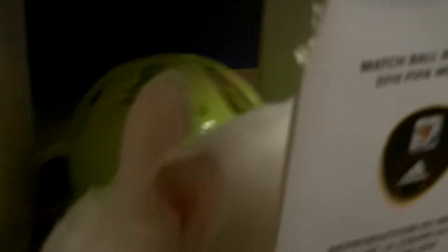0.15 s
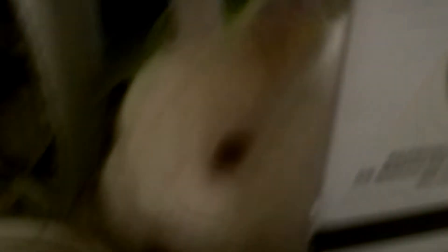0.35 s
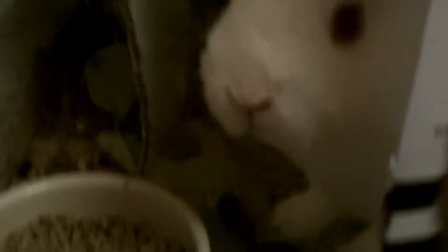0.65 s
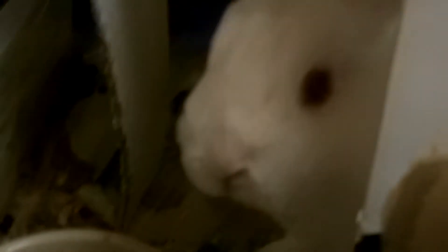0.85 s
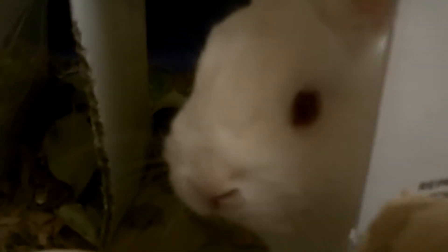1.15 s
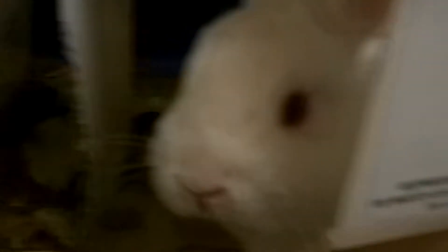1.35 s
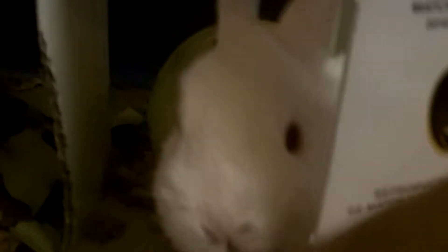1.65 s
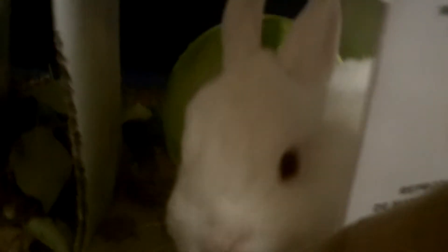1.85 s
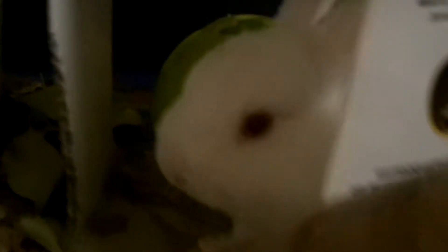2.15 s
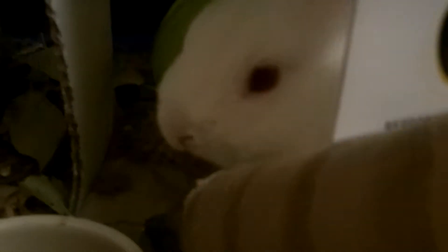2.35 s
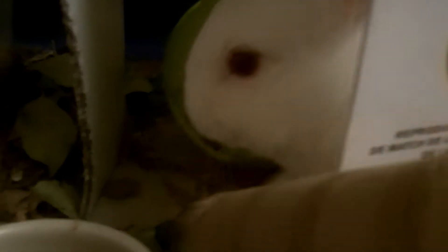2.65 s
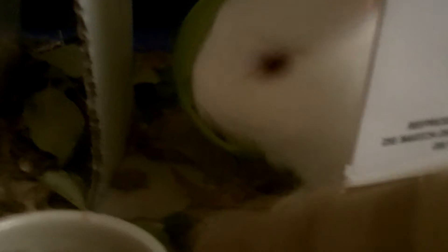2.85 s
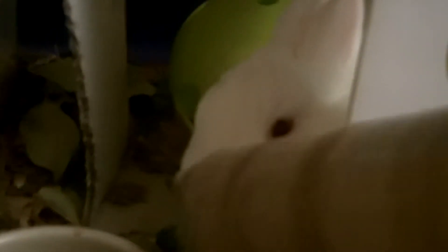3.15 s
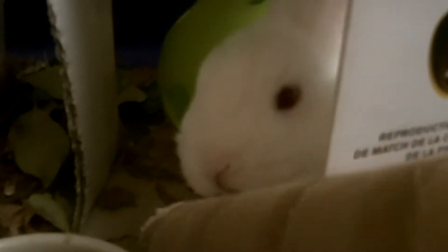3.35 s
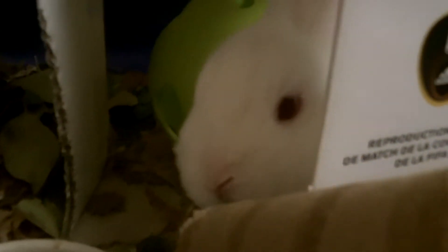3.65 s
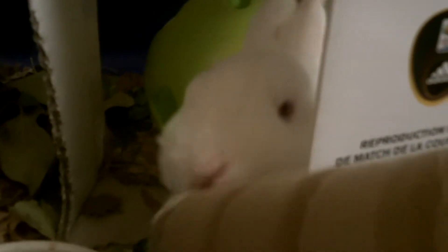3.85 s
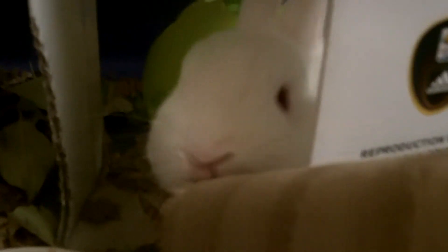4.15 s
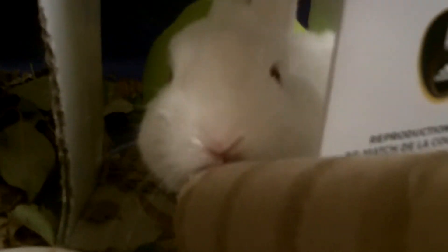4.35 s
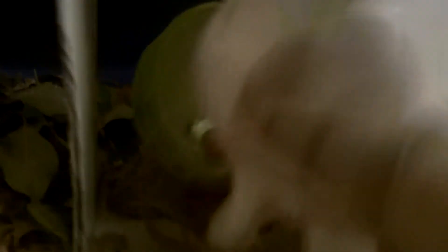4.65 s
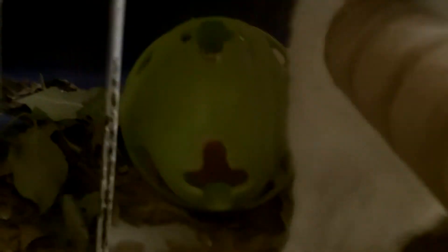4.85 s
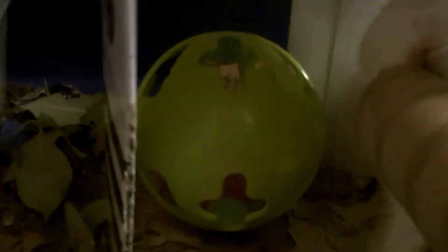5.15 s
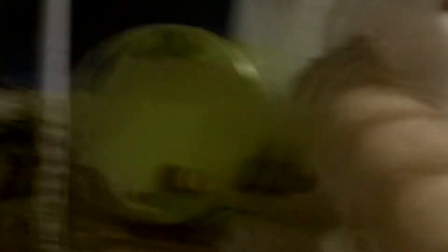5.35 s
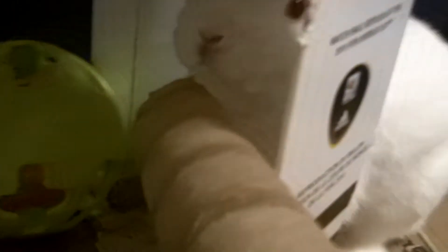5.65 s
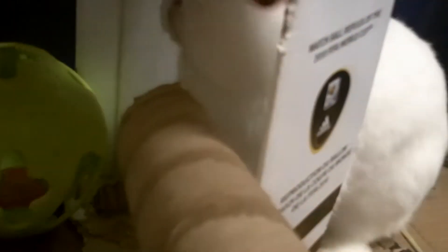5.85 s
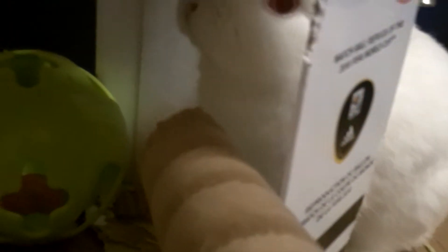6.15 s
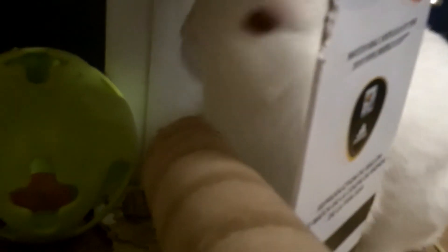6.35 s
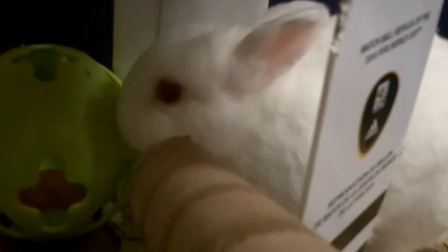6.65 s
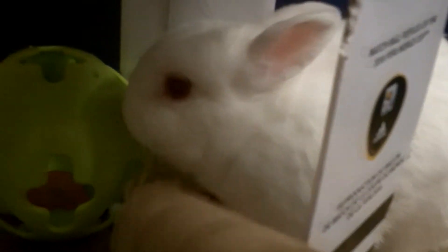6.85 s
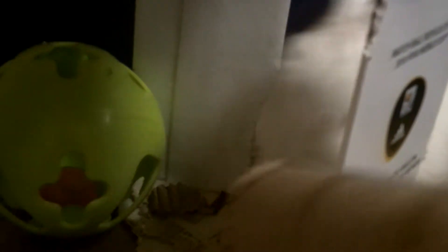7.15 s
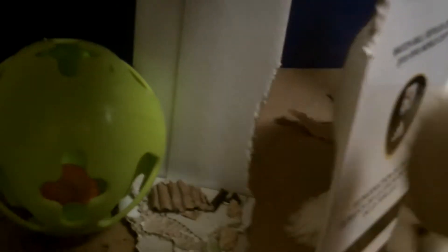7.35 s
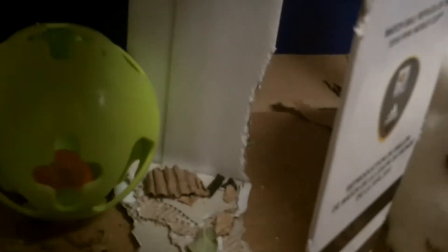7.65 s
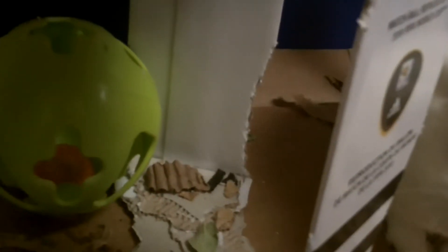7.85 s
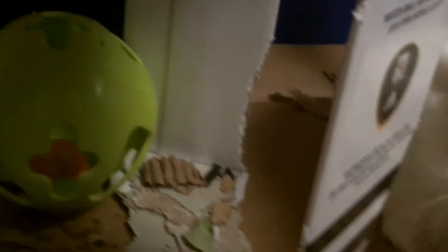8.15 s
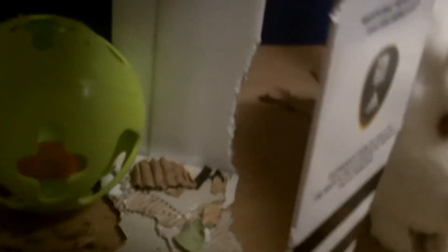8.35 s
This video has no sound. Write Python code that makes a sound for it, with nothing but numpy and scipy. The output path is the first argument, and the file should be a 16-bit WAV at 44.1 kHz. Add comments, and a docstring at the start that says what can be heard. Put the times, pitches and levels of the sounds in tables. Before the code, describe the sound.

Close to a cage in a quiet room, a rabbit scrapes cardboard. A scrape, a hollow plastic knock and tiny high squeaks open; a loud cluster of snaps and a boxy thump follow at one and a half seconds. Smaller rasps and ticks lead to another busy burst near five seconds, then sparse muffled rustles and a few late clicks.

```python
"""A quiet room, close to a cage: a small rabbit tugs and shoves at a cardboard box.
Card scrapes (dense fibre clicks), snaps (millisecond noise avalanches) and booms (resonant box).
Paws and a cardboard tube thump on the floor (damped partials); a hollow plastic ball is knocked
and brushed (ringing modes). Something smooth slips in thin, stuttering squeaks (runs of rasps).
A room tail and a faint hush lie behind."""
import sys
import numpy as np
from scipy import signal
from scipy.fft import rfft, irfft
from scipy.io import wavfile
from scipy.ndimage import uniform_filter1d, map_coordinates

SR = 44100
rng = np.random.default_rng(int(sys.argv[2]) if len(sys.argv) > 2 else 0)


def dump_mix(stems):
    """Bounce the given channels to the path in sys.argv[1] as a 16-bit WAV at rate SR."""
    frames = np.atleast_2d(stems).T  # one column per channel
    limited = np.clip(frames, -1, 1)  # hard clip at full scale
    pcm = np.round(limited * 32767).astype(np.int16)
    wavfile.write(sys.argv[1], SR, pcm)


N = 375732
TIME_S = np.arange(N) / SR
CUTOFF_HZ = 15500

# Event levels are relative: each source adds its own gain.
# tugs and shoves, card on card: peak t/s, level/dB, rise/s, fall/s, body re level/dB, edge re level/dB
STROKES = [(0, -38, .02, .14, -9, -3), (0.258, -50, 0.17, 0.44, -3, 2.5), (.58, -61, 0.19, 0.22, -5, 0.5),
           (1.47, -40.5, 0.023, 0.19, 7, -12), (1.58, -29.5, 0.087, 0.16, -2, -1),
           (1.745, -42, 0.058, .25, -3, -0.5), (1.87, -44, 0.016, 0.12, -1, 2.5),
           (1.99, -43.5, 0.022, 0.13, -5, 0.5), (2.08, -37.5, 0.065, .05, -6, 1.5),
           (2.18, -50.5, 0.19, 0.096, -1.5, 5), (2.28, -51.5, 0.11, 0.063, -4.5, 3),
           (2.37, -54.5, 0.075, 0.053, 0, 0.5), (2.435, -56, 0.02, 0.077, 1, 5),
           (2.67, -53, 0.3, 0.22, -1.5, -0.5), (2.85, -40, 0.022, 0.11, 2, -6),
           (2.995, -47.5, 0.058, 0.08, 5.5, -18), (3.08, -47, 0.1, 0.086, 0.5, -1.5),
           (3.17, -60.5, .08, 0.44, 4, -0.5), (3.5, -58.5, .04, 0.46, 13, -14),
           (3.92, -57, 0.25, 0.39, -8, 4.5), (4.048, -44.5, 0.063, 0.044, 5, 6),
           (4.33, -57, 0.32, 0.25, -14, 1.5), (4.385, -52, 0.092, 0.11, 7.5, -1),
           (4.521, -46, 0.085, 0.053, -1, -5.5), (4.565, -48.5, 0.065, 0.04, 1, 7),
           (4.758, -33, 0.11, 0.34, -8, 2.5), (4.89, -37, 0.24, 0.21, -6, -8.5),
           (5.128, -35.5, 0.032, .025, -8, 3.5), (5.16, -41, 0.24, 0.18, 2, 3),
           (5.23, -41.5, 0.12, 0.057, -17, -4), (5.42, -59.5, .04, 0.7, -3.5, -3),
           (5.729, -58, 0.18, 0.056, -2.5, 4), (5.81, -58, 0.044, 0.53, 1, 1.5),
           (6.12, -64.5, 0.077, 0.16, 8.5, -16), (6.419, -55.5, 0.089, 0.08, 6.5, -5.5),
           (6.71, -57, 0.14, .26, 3.5, -4), (6.87, -54, 0.095, .4, 0.5, -8),
           (7.0, -50.5, 0.16, 0.07, -6, -6), (7.242, -43.5, 0.045, 0.065, 4.5, -2.5),
           (7.29, -54, 0.044, 0.1, -9, 7), (7.429, -45, 0.083, 0.057, -11.5, 5.5),
           (7.58, -53, 0.24, 0.13, -7, 5), (7.83, -55, .04, 0.28, 4, -4), (8.28, -38, 0.079, 0.15, -14, -5),
           (8.41, -44.5, 0.22, 0.096, 4, -3), (8.484, -43.5, 0.019, .4, -1.5, 3)]
# resonances of the card and the hollows between them: f/Hz, width/Hz, lift/dB
CARD_MODES = [(300, 45, 4), (402, 19, 6.5), (535, 28, -2), (629, 39, 6.5), (906, 320, 4.5), (1194, 110, -3),
              (1377, 130, 3), (1760, 210, 2.5), (2070, 98, 3.5), (2610, 410, 2), (3430, 200, 2.5),
              (4787, 237, 6), (5750, 250, 2)]
# scrape spectrum: f/Hz, density/dB per Hz
SCRAPE_COLOUR = [(200, 8), (330, 6), (600, 1), (1000, -0.5), (2000, -0.5), (3500, 2), (5500, 0.5),
                 (7000, -9.5), (9500, -18), (11500, -6), (15000, -34)]
# bites, claws, creases giving way:
# t/s, level/dB, body re level/dB, edge re level/dB, length below 6 kHz/s, ring f/Hz
SNAPS = [(0.002, -25.5, -4, -5.5, 0.003, 4800), (0.106, -38, -35, 4.5, 0.0025, 3080),
         (0.723, -56.5, 5.5, -2.5, 0.0042, 4960), (1.453, -32, 3.5, -1, 0.0076, 5760),
         (1.469, -23, -10, -5.5, 0.0052, 5240), (1.482, -22, -11, -4, 0.0054, 3530),
         (1.494, -21, -27, -9, 0.006, 3520), (1.53, -27, -8, 5.5, 0.0029, 6100),
         (1.533, -19.5, 0, -5, 0.0047, 513), (1.593, -30.5, 2, 6.5, 0.0029, 4660),
         (1.723, -41.5, -4, -0.5, 0.017, 5250), (1.865, -40.5, -9, -2, 0.015, 3350),
         (1.936, -48, 3, 2.5, 0.0076, 2750), (1.954, -46, 7.5, 1, 0.0074, 2300),
         (2.092, -41, 2, -10, 0.0059, 2900), (2.748, -45.5, -3, -4.5, 0.013, 496),
         (2.836, -35, -4, -6.5, 0.0062, 1630), (2.871, -39.5, -17, 1, 0.0078, 2780),
         (2.975, -35.5, 0, -4, 0.0062, 2170), (2.978, -35, -6, -1, 0.0046, 3500),
         (2.99, -43, -11, -3, 0.0069, 1900), (3.028, -35.5, -1, -10, 0.0026, 910),
         (3.05, -28.5, -8.5, -6, 0.0043, 2800), (3.15, -44, 1.5, -5, 0.013, 2700),
         (3.193, -45.5, 2.5, -6, 0.0066, 1610), (3.364, -55, -1, 1, 0.0038, 3500),
         (3.472, -34.5, 3, -2.5, 0.0044, 1610), (3.594, -43, 6.5, -1, 0.0065, 1740),
         (4.019, -33, -14, -3, 0.0017, 3260), (4.04, -35, -13, -10, 0.011, 1290),
         (4.058, -33, -14, -14, 0.0065, 1340), (4.385, -43.5, -18, -2, 0.012, 2040),
         (4.756, -27.5, -2, -2, 0.0026, 1390), (4.768, -27.5, -28, -5, 0.0035, 4930),
         (4.879, -29.5, -7, -5.5, 0.0061, 5100), (4.894, -30.5, -3, -2, 0.0047, 4450),
         (4.995, -39.5, -15, -10, 0.0077, 1440), (5.072, -24.5, -18, -31, 0.0037, 1050),
         (5.18, -33, -24, -5, 0.0049, 3420), (5.228, -34, -19, -8, 0.0082, 3000),
         (5.236, -33.5, -32, 1, 0.0027, 3730), (5.34, -45, 0, -11, 0.01, 2880),
         (5.39, -37, -22, 1, 0.0047, 2880), (5.402, -39, -23, -3, 0.016, 5020),
         (5.535, -46.5, 0.5, -14, 0.0063, 970), (5.779, -35.5, -12, -4.5, 0.0071, 4980),
         (5.878, -44, -6, 1, 0.0042, 5400), (5.995, -57, 11.5, -1, 0.016, 3650),
         (7.149, -35, 4.5, -9, 0.0066, 504), (7.223, -42, 0, -4.5, 0.0069, 5770),
         (7.619, -59, -7, 20, 0.0021, 4950), (7.778, -44, 2, -35, 0.0034, 1650),
         (7.808, -42, -2.5, -1.5, 0.0057, 3660), (8.124, -34.5, 1.5, -10.5, 0.005, 1670),
         (8.163, -26, 2, -6.5, 0.001, 1620), (8.187, -39.5, 4.5, -10, 0.0076, 1810),
         (8.403, -44.5, -1, -4, 0.018, 1850), (8.505, -39.5, -16, -6, 0.011, 2010)]
# snap spectrum: f/Hz, density/dB per Hz
SNAP_COLOUR = [(200, -26), (330, 3), (600, 0), (1000, -3.5), (2000, -0.5), (3500, 1.5), (5500, 1),
               (7000, -9.5), (9500, -17), (11500, -8.5), (15000, -28.5)]
# pitches of a snapping flap: multiple of ring f/1, lift/dB
FLAP_MODES = [(1.0, 11), (.68, 2.5)]
# soft blows on floor and box: t/s, level/dB, nominal f/Hz
THUMPS = [(0.274,-37,66.4), (0.341,-42,119), (1.452,-32.5,162), (1.47,-23,124), (1.533,-15.5,315),
          (1.536,-20,95), (2.749,-27.5,111), (2.871,-26,102), (2.977,-27.5,123), (3.049,-27,92),
          (3.475,-35,136), (3.711,-35,106.6), (4.033,-41,125), (4.315,-43,106), (4.879,-31,215),
          (5.158,-28.5,101), (5.173,-34,114), (5.192,-24,362), (5.223,-33,272), (5.794,-36.5,69),
          (7.149,-29.5,276), (7.245,-41,223), (7.319,-38,69.4)]
# partials of a struck panel: multiple of nominal f/1, level/dB
PANEL_PARTIALS = [(.55, -8.5), (1.03, 0.5), (1.7, -6.5), (3.1, -7)]
# knocks on the plastic ball: t/s, level/dB
KNOCKS = [(.233, -22.5), (.283, -33), (.293, -35), (0.999, -34.5), (5.072, -29), (5.113, -44)]
# modes of the ball: f/Hz, level/dB, t60/s
BALL_MODES = [(921, -2, 0.042), (967, 2.5, 0.043), (1043, -1.5, 0.023), (1494, -1.5, 0.019),
              (1720, -11, .028), (2160, -9.5, .025), (2480, -11, 0.0077)]
# fur brushing along the ball: middle t/s, half length/s, level/dB
BRUSHES = [(2.638, 0.052, -51)]
# stick-slip runs: first slip t/s, last slip t/s, slips/1, first slip level/dB, fade over run/dB, ring f/Hz
SQUEAK_RUNS = [(0.033, 0.106, 4, -34.5, -0.5, 11050), (0.12, 0.195, 6, -44, 8, 10800),
               (.217, 0.321, 7, -33.5, 1.5, 11200), (0.359, 0.469, 7, -43, -5, 9410),
               (1.003, 1.019, 2, -53, 2, 9480), (4.944, 5.043, 5, -29.5, 7.5, 11270),
               (5.083, 5.116, 3, -33.5, -1, 8950), (6.015, 6.039, 2, -45.5, 7, 11550)]
# resonances of the squeaking surface: f/Hz, width/Hz, lift/dB
SQUEAK_MODES = [(9260, 190, 8.5), (10500, 300, 2), (11200, 370, 4), (11900, 400, 2.5), (13500, 220, 1)]
# air and wall resonances of the box: f/Hz, width/Hz, level/dB
BOX_MODES = [(133.5, 9.9, 8.5), (144.5, 9.7, -5.5), (408.6, 23, -10), (439.6, 18, -12.5),
             (612.5, 11, -13.5), (647, 20, -16.5), (770, 61, -27.5), (867, 19, -16.5), (1370, 53, -24.5),
             (1513, 29, -27.5), (1970, 39, -28)]
# absorption above the box's two lowest resonances: f/Hz, width/Hz, lift/dB
BOX_DIP = [(223, 140, -6)]
# rabbit leans and rubs on the box: peak t/s, level/dB, rise/s, fall/s
LEANS = [(.33, -45.5, .15, 0.25), (3.099, -44.5, 0.53, 0.83), (6.151, -57.5, 0.27, .4),
         (6.45, -53, 0.17, 0.21), (6.85, -45.5, 0.34, 0.39), (7.85, -46, 0.17, 0.29),
         (8.26, -37.5, 0.21, 0.29)]
# room decay: f/Hz, t60/s
ROOM_DECAY = [(100, 0.63), (500, 0.44), (2000, 0.18), (5000, 0.26), (12000, 0.16)]
# hush spectrum: f/Hz, relative level/dB
HUSH_COLOUR = [(25, 3), (60, -9.5), (130, -11), (200, -11), (280, -11), (450, -18), (900, -21.5),
               (2000, -28.5), (4500, -34.5), (7000, -35.5), (10000, -33), (15000, -36)]
# narrow dips of the microphone: f/Hz, width/Hz, lift/dB
MIC_DIPS = [(4197, 530, -58), (7764, 2000, -23.5), (8630, 630, -30.5), (12100, 110, -23)]

STROKE_RANGE_DB = 21.5  # level change over one rise or one fall
FIDGET_DB, FIDGET_SWING_DB = -77.5, 1  # litter stirring between strokes, relative
HIDE_AT_S, HIDE_TAKES_S, HIDE_CORNER_HZ = 7.03, .1, 11600
FLAP_WIDTH_HZ, FLAP_WIDTH_SHARE = 60, .06  # fixed part, share of pitch
PANEL_CYCLES = 1.28  # cycles to 1/e
SLIP_JITTER_S, SLIP_SPREAD_DB, SLIP_PITCH_SPREAD = .001, 1.5, .012
BOOM_DB, BOOM_BODY_SHARE, BOOM_LINGER_S, BOOM_REST_DB = -8, .5, .051, -61  # BOOM_DB re stroke
RUMBLE_DB, RUMBLE_FOLLOWS = -40.5, .38  # offset, share of boom swing
HUSH_DB = -61.5


def from_db(db):
    """Amplitude ratio of a level in dB."""
    return 10 ** (np.asarray(db) / 20)


def rms_one(x):
    """Scale to rms 1."""
    return x / np.sqrt(np.mean(x ** 2) + 1e-20)


def at_hz(points, hz):
    """Read a spectrum on a log-frequency axis."""
    points = np.array(points)
    return np.interp(np.log(hz), np.log(points[:, 0]), points[:, 1])


def add(track, s, sound):
    """Mix a sound in at s seconds."""
    start = max(round(s * SR), 0)
    track[start:start + len(sound)] += sound[:max(N - start, 0)]


def drift(rate_hz):
    """Smooth random wander, spread about 1, rate_hz knots per second."""
    knots = rng.standard_normal(N // 40)
    return np.interp(TIME_S * rate_hz, np.arange(len(knots)), knots) * np.sqrt(3 / 2)


def highpass(x, order, hz):
    """Butterworth high-pass."""
    return signal.sosfilt(signal.butter(order, hz, "high", fs=SR, output="sos"), x)


def band(x, low_hz, high_hz):
    """Butterworth band-pass."""
    return signal.sosfilt(signal.butter(2, [low_hz, high_hz], "band", fs=SR, output="sos"), x)


def split(two_sources, lowest_hz, count):
    """Yield (centre Hz, band); neighbours come from different sources."""
    edges_hz = np.geomspace(lowest_hz, CUTOFF_HZ, count + 1)
    for k, (low, high) in enumerate(zip(edges_hz, edges_hz[1:])):
        yield np.sqrt(low * high), band(two_sources[k % 2], low, high)


def resonate(x, hz, width_hz):
    """Resonance with gain 1 on top."""
    return signal.lfilter(*signal.iirpeak(hz, hz / width_hz, fs=SR), x + 1e-18)


def equalise(x, peaks):
    """Lift or sink the sound around each resonance in turn."""
    for hz, width_hz, db in peaks:
        x = x + (from_db(db) - 1) * resonate(x, hz, width_hz)
    return x


def tone_db(hz, body_db, edge_db):
    """Broad contact weights the spectrum below 1 kHz (body), sharp contact above 4 kHz (edge)."""
    body_share = at_hz([(700, 0.93), (1400, 0)], hz)
    edge_share = at_hz([(2800, 0.086), (4600, 0.88)], hz)
    return body_db * body_share + edge_db * edge_share


def swell(s, level_db, rise_s, fall_s):
    """Power of one movement: builds up and dies away, linear in dB."""
    away = np.maximum((s - TIME_S) / rise_s, (TIME_S - s) / fall_s)
    return from_db(level_db - STROKE_RANGE_DB * np.minimum(away, 6)) ** 2


def rubbing():
    """Level, body and edge of all strokes in dB; the stronger stroke dominates the colour."""
    power = from_db(FIDGET_DB + FIDGET_SWING_DB * drift(5.4)) ** 2
    body, edge = 0, 0
    for s, level_db, rise_s, fall_s, body_db, edge_db in STROKES:
        stroke = swell(s, level_db, rise_s, fall_s)
        power = power + stroke
        body = body + body_db * stroke
        edge = edge + edge_db * stroke
    return 10 * np.log10(power), body / power, edge / power


def grains(per_s, spread_db):
    """Fibres catch and let go at random: clicks of uneven size, rms 1."""
    sizes = from_db(spread_db * np.minimum(rng.exponential(1, N), 4))
    signs = rng.choice([-1, 1], N)
    return rms_one(sizes * signs * (rng.random(N) < per_s / SR))


def catches(per_s, size):
    """Grip tightens suddenly and lets go within a few ms; rms 1."""
    jolts = (rng.random(N) < per_s / SR) * rng.uniform(0.076, 1, N)
    keep = np.exp(-1 / (.004 * SR))
    return rms_one(1 + size * signal.lfilter([1], [1, -keep], jolts + 1e-18))


def near_wall(x):
    """A wall of the box echoes within a few ms; the lag drifts."""
    lag_s = .004 * from_db(1.452 * np.clip(drift(1.5), -2, 2))
    return x + .5 * map_coordinates(x, [(TIME_S - lag_s) * SR], order=3)


def scrape(level_db, body_db, edge_db):
    """Dense fibre clicks in gritty clusters plus coarser crackles; the colour wanders."""
    clumps = catches(per_s=75, size=1.7) * from_db(1.61 * drift(70))
    crackles = from_db(-4.5) * grains(per_s=160, spread_db=6.5)
    fibres = [clumps * grains(per_s=5000, spread_db=2.5) + crackles for _ in range(2)]
    # light rubbing has less top than hard rubbing
    soft_db = 0.136 * np.minimum(level_db + 44.5, 0)
    out = np.zeros(N)
    for hz, noise in split(fibres, lowest_hz=185.4, count=30):
        colour_db = at_hz(SCRAPE_COLOUR, hz) + tone_db(hz, body_db, edge_db) + soft_db * (hz > 7000)
        wander_db = 2.4 * drift(35)
        out += noise * from_db(colour_db + wander_db)
    return near_wall(out * from_db(level_db + 5.5))


def snaps():
    """An avalanche of tiny breaks, a few ms long, rings the flap of card it happens in."""
    out, t = np.zeros(N), TIME_S[:SR // 25]
    bands = list(split(rng.standard_normal((2, N)), lowest_hz=189.8, count=19))
    hz = np.array([centre for centre, _ in bands])
    noise = np.array([sound for _, sound in bands])
    band_rms = noise.std(axis=1)
    for k, (s, level_db, body_db, edge_db, length_s, ring_hz) in enumerate(SNAPS):
        spread_db = rng.normal(0, 1.8, len(hz))
        colour = from_db(at_hz(SNAP_COLOUR, hz) + tone_db(hz, body_db, edge_db) + spread_db)
        # the highest bands die first
        lengths_s = length_s * at_hz([(6000, 1), (11000, 0.77)], hz)[:, None]
        envelope = (1 - np.exp(-t / 0.00012)) * np.exp(-(t / lengths_s) ** 2)
        bursts = noise[:, k * len(t):(k + 1) * len(t)] * envelope
        # fix each band's energy against the chance of a short noise burst
        share = band_rms * np.linalg.norm(envelope[0]) / np.linalg.norm(bursts, axis=1)
        flap = []
        for ratio, lift_db in FLAP_MODES:
            flap_hz = ratio * ring_hz
            flap.append((flap_hz, FLAP_WIDTH_HZ + FLAP_WIDTH_SHARE * flap_hz, lift_db))
        crack = equalise((colour * share) @ bursts, flap)
        add(out, s, from_db(level_db + 9) * crack)
    return out


def behind_wall(x):
    """The rabbit withdraws behind the box wall, which shades the treble."""
    hidden = np.clip((TIME_S - HIDE_AT_S) / HIDE_TAKES_S, 0, 1)
    dull = signal.sosfilt(signal.butter(2, HIDE_CORNER_HZ, fs=SR, output="sos"), x)
    return (1 - hidden) * x + hidden * dull


def booming(level_db, body_db):
    """Boom level in dB: follows the strokes with a lag, swells when the rabbit leans on the box."""
    keep = np.exp(-1 / (BOOM_LINGER_S * SR))
    drive = from_db(level_db + BOOM_BODY_SHARE * body_db + BOOM_DB) ** 2
    driven = signal.lfilter([1 - keep], [1, -keep], drive)
    leaning = sum(swell(*lean) for lean in LEANS)
    return 10 * np.log10(driven + leaning + from_db(BOOM_REST_DB) ** 2)


def box(blows, boom_db):
    """Friction and blows excite the hollow box's modes; the cage floor rumbles under it."""
    friction = rng.standard_normal(N)
    boom, ring = np.zeros(N), np.zeros(N)
    for hz, width_hz, db in BOX_MODES:
        mode = resonate(friction, hz, width_hz)
        boom += from_db(db) * band(mode, hz - 3 * width_hz, hz + 3 * width_hz)
        ring += from_db(db) * resonate(blows, hz, width_hz)
    boom = rms_one(boom)
    # even out the boom's level
    boom = boom / np.sqrt(uniform_filter1d(boom ** 2, size=3000) + 0.11)
    rumble = rms_one(band(rng.standard_normal(N), 20, 110))
    rumble_db = RUMBLE_FOLLOWS * boom_db + RUMBLE_DB
    return from_db(boom_db) * boom + from_db(-13.5) * ring + from_db(rumble_db) * rumble


def thumps():
    """A soft blow rocks a damped panel for a cycle or two, in several partials."""
    out, t = np.zeros(N), TIME_S[:SR // 5]
    for s, level_db, hz in THUMPS:
        for ratio, db in PANEL_PARTIALS:
            cycles = hz * ratio * rng.uniform(0.85, 1.2) * t
            partial = np.sin(2 * np.pi * cycles) * np.exp(-cycles / PANEL_CYCLES)
            add(out, s, from_db(level_db + db) * partial)
    return highpass(out, 2, 42)


def ball():
    """Each knock makes the hollow ball chatter and ring; brushing draws a hollow rub from it."""
    out, t = np.zeros(N), TIME_S[:SR // 4]
    for s, level_db in KNOCKS:
        ring = np.zeros(len(t))
        for hz, db, t60_s in BALL_MODES:
            mode_hz = hz * rng.normal(1, 0.0083)
            ring += np.sin(2 * np.pi * mode_hz * t) * from_db(db - 60 * t / t60_s)
        chatter = .02 * rng.standard_normal(len(t)) * np.exp(-t / .009)
        chatter[0] = 1  # first contact
        add(out, s, from_db(level_db) * band(signal.fftconvolve(ring, chatter), 1250, 5600))
    pressure = sum(from_db(db) * np.exp(-((TIME_S - s) / half_s) ** 4) for s, half_s, db in BRUSHES)
    rub = rms_one(band(band(grains(per_s=2100, spread_db=6.0), 1000, 1500), 770, 3300))
    return out + pressure * rub


def squeaks():
    """A surface sticks and slips at a near-steady rate; each slip is a short, high, ringing rasp."""
    out, t = np.zeros(N), TIME_S[:SR // 20]
    envelope = (1 - np.exp(-t / 0.0013)) * np.exp(-(t / 0.0063) ** 2)
    for first_s, last_s, slips, first_db, fade_db, hz in SQUEAK_RUNS:
        for along in np.linspace(0, 1, round(slips)):
            late, louder, sharper = rng.standard_normal(3)
            rasp = rng.standard_normal(len(t)) * envelope
            slip = rasp + 3.5 * resonate(rasp, hz * (1 + SLIP_PITCH_SPREAD * sharper), 150)
            slip_db = first_db - fade_db * along + SLIP_SPREAD_DB * louder
            slip_s = first_s + along * (last_s - first_s) + SLIP_JITTER_S * late
            add(out, slip_s, from_db(slip_db) * slip)
    top = highpass(band(out, 7800, 13000), 4, 8500)
    return from_db(-1.0) * equalise(top, SQUEAK_MODES)


def room(x):
    """Diffuse tail: builds up within a few ms, decay time set per band."""
    t = TIME_S[:SR // 2]
    bands = split(rng.standard_normal((2, len(t))), lowest_hz=54.6, count=12)
    tail = sum(noise * from_db(-60 * t / at_hz(ROOM_DECAY, hz)) for hz, noise in bands)
    tail = tail * (1 - np.exp(-t / 0.0031))
    return signal.fftconvolve(x, tail / np.linalg.norm(tail))[:N]


def hush():
    """The still room: steady noise shaped in the spectrum."""
    hz = np.maximum(np.fft.rfftfreq(N, 1 / SR), 1)
    spectrum = rfft(rng.standard_normal(N)) * from_db(at_hz(HUSH_COLOUR, hz))
    return from_db(HUSH_DB) * rms_one(irfft(spectrum, N))


def scene():
    """Sum the direct sources, the box's response, the room tail and the hush."""
    level_db, body_db, edge_db = rubbing()
    sliding = behind_wall(equalise(scrape(level_db, body_db, edge_db), CARD_MODES))
    cracks = behind_wall(equalise(snaps(), CARD_MODES))
    blows = thumps()
    plastic = ball() + squeaks()
    hollow = box(cracks + from_db(-6.0) * blows, booming(level_db, body_db))
    send = from_db(-28) * sliding + from_db(-10.5) * cracks
    send += from_db(-11.5) * blows + from_db(-7.5) * plastic
    cage = sliding + cracks + blows + plastic + hollow + room(send)
    return (equalise(cage, BOX_DIP) + hush())[None]


def record(dry):
    """The microphone has a few narrow dips; an elliptic low-pass cuts the top."""
    top_cut = signal.ellip(10, .2, 70, CUTOFF_HZ, fs=SR, output="sos")
    return signal.sosfilt(top_cut, equalise(dry, MIC_DIPS))


dry = scene()
out = record(dry)
dump_mix(out)
```